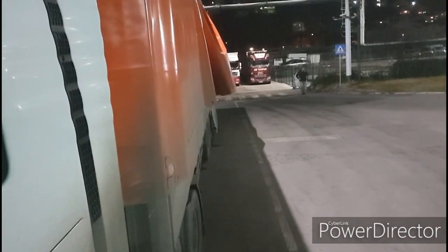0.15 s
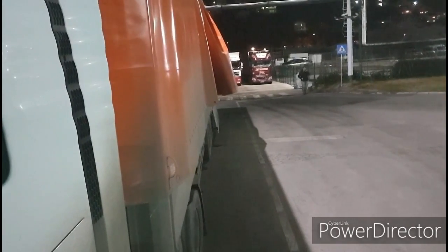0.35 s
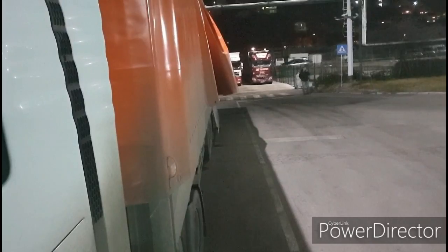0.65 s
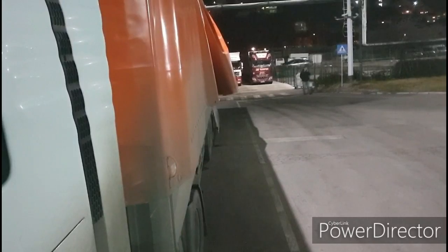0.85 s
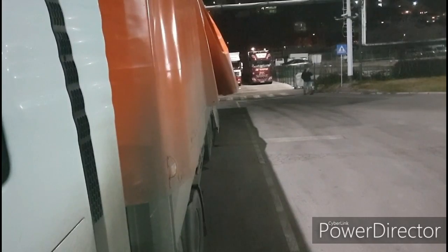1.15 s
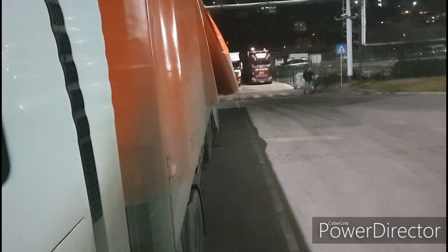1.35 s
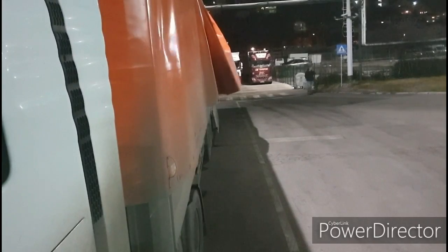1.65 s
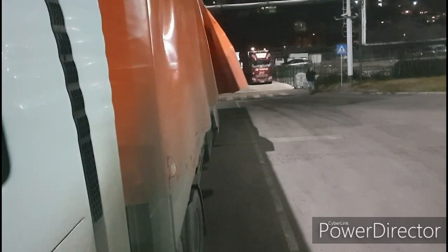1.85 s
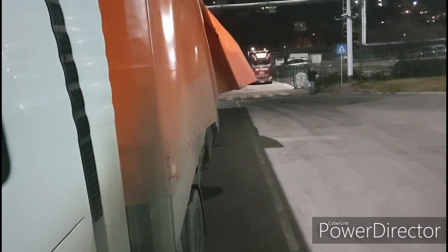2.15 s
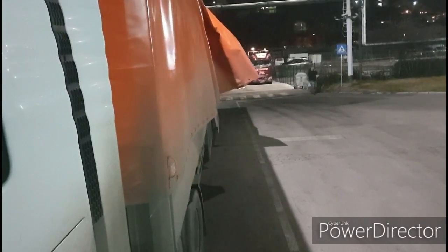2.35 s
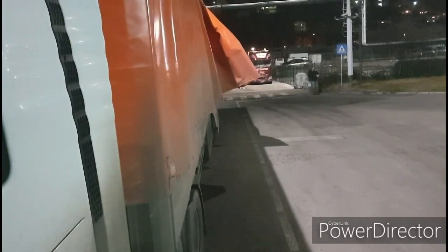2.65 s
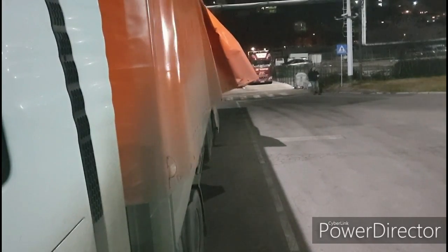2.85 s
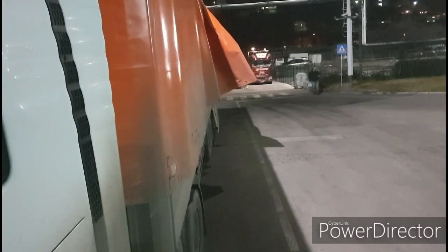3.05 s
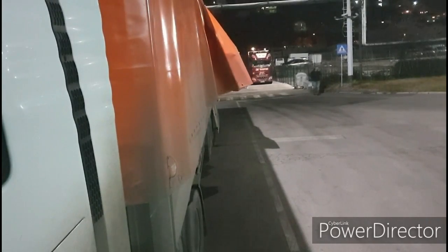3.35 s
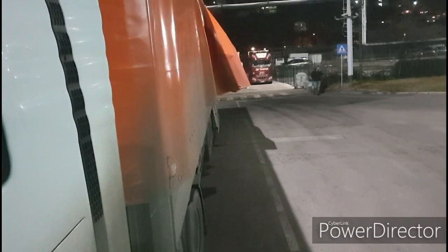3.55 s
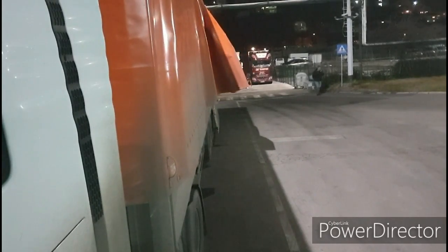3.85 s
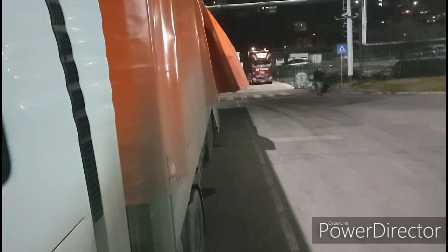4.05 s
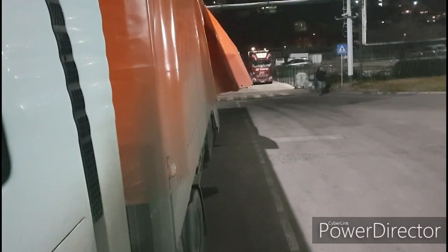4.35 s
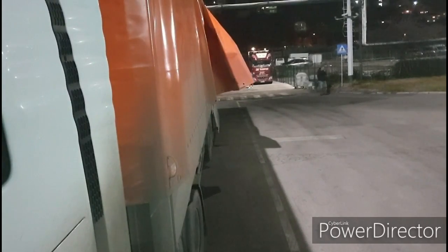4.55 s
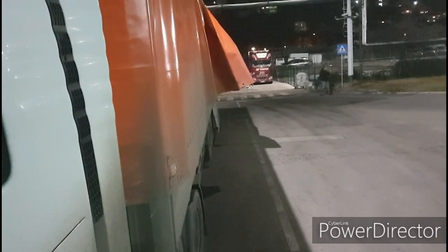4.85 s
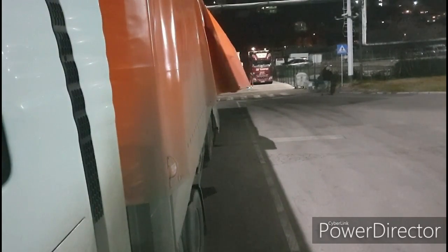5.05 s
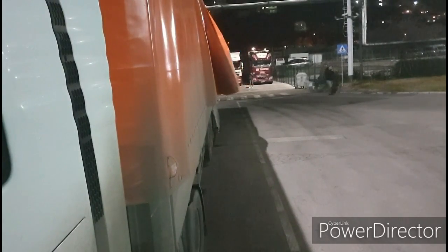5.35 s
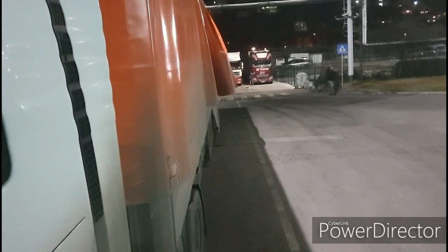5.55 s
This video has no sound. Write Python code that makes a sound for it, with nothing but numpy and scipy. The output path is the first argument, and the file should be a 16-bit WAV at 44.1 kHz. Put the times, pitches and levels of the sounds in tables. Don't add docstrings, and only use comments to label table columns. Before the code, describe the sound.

Handheld phone beside a parked curtain-sided trailer outdoors: steady low engine hum that swells and fades, with wind thumping the microphone in the first second. The tarpaulin rustles, snaps taut and knocks its side into a resonant boom with rebounds. Later come lighter slaps, a sharp triple tick, heaving fabric, and a sudden rattling metal clank to finish.

```python
import sys
import numpy as np
from scipy import signal
from scipy.fft import rfft, irfft
from scipy.io import wavfile
from scipy.ndimage import uniform_filter1d

SR = 44100
rng = np.random.default_rng(int(sys.argv[2]) if len(sys.argv) > 2 else 0)


def wrap_up_sound(samples):
    columns = np.atleast_2d(samples).T
    tamed = np.clip(columns, -1, 1)
    steps = np.round(tamed * 32767).astype(np.int16)
    wavfile.write(sys.argv[1], SR, steps)


def field_ratio(decibels):
    return 10 ** (np.asarray(decibels, dtype=float) / 20)


N = 251539
T = np.arange(N) / SR

SLOW_HZ, FAST_HZ = 47.51, 49.42
SLOW_ORDERS = [(1, -44.5), (2, -34.5), (3, -56), (4, -53.5), (6, -59.5)]
FAST_ORDERS = [(1, -48.5), (1.5, -53.5), (2, -31), (3, -40.5), (4, -58.5), (6, -56)]
OPPOSED_S = .172
# (frequency [Hz], level [dB])
HUMS = [(63.5, -52), (111.15, -53), (126.89, -45), (223, -55), (260.09, -50), (277.36, -48), (333.5, -55)]
HUM_TRIMS = [-5.5, 1.5, -1.5, -1, 0.5, 3, -1]
# (frequency [Hz], density [dB per Hz])
YARD_SPECTRUM = [(20, -23.5), (40, -29), (60, -10), (120, -15.5), (200, -21.5), (280, -21), (430, -28),
                 (800, -38.5), (1050, -30), (1500, -41.5), (2100, -43.5), (3000, -48.5), (7000, -56.5),
                 (8600, -72)]
YARD_DB = -37
# (frequency [Hz], shared power [0-1])
COHERENCE = [(60, 0.89), (300, 1), (640, 0.4), (2000, 0.66), (7000, 0.14), (10000, 0.04)]
FAR_LAG, BELLY_LAG, NEAR_LAG = 21, 11.5, -4
LEFT_DB = -1.24

# (time [s], level [dB])
LOAD = [(0, -57.5), (.3, -54.5), (.47, -66), (.74, -56), (1.1, -63), (1.35, -59.5), (1.8, -53.5),
        (2.15, -51.5), (2.5, -49.5), (2.8, -52), (3.31, -47), (3.6, -50), (3.85, -55), (4.14, -51),
        (4.45, -48.5), (5.05, -48.5), (5.17, -56.5), (5.7, -63.5)]
# (time [s], skin crackle [dB], belly heave [dB])
SNAPS = [(-.03, -76, -65.5), (.7, -79, -42), (1.1, -74, -49.5), (1.28, -82.5, -54), (1.95, -95, -44.5),
         (2.45, -89, -41.5), (2.56, -63.5, -62.5), (2.8, -76, -45.5), (3.57, -74, -42), (4.05, -76, -36.5),
         (4.19, -61.5, -46), (4.27, -62.5, -52), (4.47, -78.5, -42), (4.72, -87, -46.5), (4.93, -87, -37),
         (5.16, -88, -44), (5.45, -69, -58), (5.57, -69, -57)]
SNAP_RISE_S, CRACKLE_T60_S, HEAVE_T60_S = .025, .45, 0.7
BELLY_DB, SKIN_DB, FOLDS_DB = -46.5, -89, -21
BELLY_PER_LOAD, BELLY_PER_GAIN = 0.22, 0.71
# (frequency [Hz], density [dB per Hz])
BELLY_SPECTRUM = [(150, -7.5), (300, 4), (500, 4.5), (800, -5), (1200, -49.5)]
RUSTLE_SPECTRUM = [(600, -11.5), (1000, 1.5), (1500, -3), (2100, -4), (2900, -13.5), (4200, -10.5),
                   (6000, -32), (8500, -50)]
FOLDS_SPECTRUM = [(2000, -26), (3500, 0.5), (5500, -2.5), (7000, -3.5), (8500, -32.5)]
SKIN_SPECTRUM = [(6000, -39.0), (8000, 1.5), (9500, -3), (11000, -1), (13500, 1.0), (15500, -5.5)]

# (time of peak [s], level [dB], half length [s])
GUSTS = [
    (0, -41, .2),
    (.42, -38, .2),
    (.75, -33, .35),
    (1.6, -39, .2),
    (1.85, -37, .2),
    (2.4, -36, .25),
    (2.7, -38, .15),
    (3.3, -36, .25),
    (3.55, -40, .2),
    (5.6, -46, .12),
]
BREEZE_DB = -48.5
# (frequency [Hz], density [dB per Hz])
RUMBLE_SPECTRUM = [(15, -33), (40, 12.5), (90, 9.5), (140, 5), (300, -2.0), (600, -52.0)]
# (time [s], peak level [dB], pitch [Hz], left minus right [dB])
BUFFETS = [(0.124, -31, 61, -5), (0.367, -28.5, 55, 7), (.515, -31, 97, -3), (.59, -24.5, 98.6, -10),
           (0.636, -40, 100, -23), (.70, -35.5, 61.4, -10), (0.8715, -17, 94.2, -1.5), (.655, -32, 437, 3),
           (.76, -36, 243, -10), (.775, -34, 480, 5), (.82, -34, 193, -3), (.97, -31, 264, -2),
           (1.595, -32.5, 99, 4)]
# (time [s], peak level [dB], pitch [Hz], left minus right [dB])
PUFFS = [
    (.42, -45, 131, 3),
    (.787, -24, 91, 6),
    (0.947, -28, 105, -4),
    (1.824, -28.5, 59.6, 4),
    (5.626, -14.5, 93.5, 2.5),
    (5.686, -33, 110, -2),
]
BUFFET_SWINGS, PUFF_SWINGS = 2.47, 1.4

# (time [s], level [dB], t60 [s], brightness [dB per octave])
SLAPS = [(.57, -58, .05, -3), (.645, -42.5, 0.45, -0.5), (.70, -47, 0.45, 2.5), (1.248, -38, 0.17, 1.5),
         (2.184, -31.5, 0.12, 3.5), (2.2, -32.5, 0.24, 0.5), (2.325, -33, 0.32, -0.5),
         (2.8, -48.5, 0.74, 4.5), (3.58, -46.5, 0.12, 5.5), (4.111, -34.5, 0.05, -3),
         (4.25, -58.5, 0.4, 11.5), (4.46, -41.5, 0.4, 3), (4.955, -36.5, 0.14, -0.5),
         (5.092, -36, 0.05, -9), (5.44, -66, .1, 1)]
# (frequency [Hz], density [dB per Hz])
SLAP_SPECTRUM = [(300, -31), (550, -0.5), (1090, -2), (1400, -12.5), (3600, -18.5), (5400, -26.5),
                 (9000, -42), (13700, -51), (15500, -56.5)]
SLAP_RISE, THUD_RISE, BUCKLE_RISE, CRASH_RISE = 0.034, .03, 0.016, 0.019

# (frequency [Hz], level [dB], t60 [s])
PANEL_MODES = [(143, -21, 0.36), (201.5, -5.5, 0.67), (255.6, -5, 0.48), (291.8, -4.5, 0.45),
               (337.7, -13, 0.59), (480, -6, 0.2), (539, -13, 0.15), (661, -15, 0.19), (818, -15, 0.35),
               (1130, -16.5, .2)]
# (time [s], level [dB], length of push [s])
BLOWS = [(1.25, -32.5, .0013), (2.1832, -10.5, 0.0037), (2.213, -14, 0.0016), (2.262, -18, 0.0012),
         (2.287, -16, 0.0021), (2.326, -21, 0.0045), (2.34, -24, 0.0014), (2.365, -23.5, 0.0013),
         (2.382, -23.5, 0.0018), (2.415, -23.5, 0.0016), (2.801, -27.5, 0.0018), (2.869, -28.5, 0.0025),
         (4.95, -27, 0.0012), (5.019, -31.5, 0.00078), (5.633, -16.5, 0.0012), (5.666, -16, 0.00086),
         (5.682, -34.5, 0.00065)]
# (frequency [Hz], density [dB per Hz])
THUD_SPECTRUM = [(120, -20), (220, -1), (400, 1.5), (650, -5), (1100, -17.5), (1800, -43.5)]
THUD_DB, THUD_T60_S = -16, .2

# (time [s], level [dB], t60 [s], brightness [dB per octave])
BUCKLE_TICKS = [
    (4.1805, -28, .035, 0),
    (4.188, -35, .06, 0),
    (4.199, -41, .09, 0),
]
# (frequency [Hz], density [dB per Hz])
TICK_SPECTRUM = [(600, -15), (1000, 4), (1700, -17), (2600, -8.5), (3300, 0.5), (4600, -6.5), (5400, -18),
                 (8000, -34), (15000, -45)]

# (time [s], level [dB], t60 [s], brightness [dB per octave])
CRASH = [
    (5.611, -29.5, 0.44, 0.5),
    (5.6165, -22.5, 0.16, -2),
    (5.628, -26, 0.1, 2.5),
    (5.6365, -20, 0.033, 0),
    (5.646, -26.5, 0.21, 4.5),
    (5.655, -21.5, .08, -6),
    (5.668, -24, 0.11, -5.5),
    (5.683, -19.5, 0.19, -9.5),
]
# (frequency [Hz], density [dB per Hz])
LATCH_SPECTRUM = [(300, -14), (500, -9.5), (630, -12), (1260, -4.5), (1600, -8), (2000, -5.5),
                  (2650, -11.5), (3300, -7), (5000, -14.5), (9900, -25.5), (12500, -27), (12900, -66),
                  (14300, -47.5), (15000, -62.5)]
# (frequency [Hz], level [dB], t60 [s])
BAR_MODES = [(1278, -3.5, 0.062), (1420, -9, 0.045), (1907, -4, 0.041), (2113, -4.5, 0.052),
             (3160, -6, 0.036), (3550, -7, 0.048), (4330, -7.5, 0.099), (5140, -5, 0.045),
             (6240, -4, 0.054)]
# (time [s], peak level [dB])
KNOCKS = [
    (5.6175, -28),
    (5.6372, -16),
    (5.658, -25.5),
    (5.682, -24),
]

# (time [s], step [dB])
GAIN_STEPS = [
    (-.5, -6),
    (.13, -2),
    (.42, -3.5),
    (2.12, 2.5),
    (2.35, -3.5),
    (5.1, 0),
    (5.58, 3.5),
]
OPEN_DB, STEP_S, RECOVER_S = 3, 0.069, 1.97
# (time [s], depth [dB])
GUST_DIPS = [(0.47, -12), (0.552, -25), (.67, -24), (0.728, -23), (0.823, -12), (0.93, -4), (0.972, -7),
             (3.304, -8), (3.578, -6), (4.08, -3), (5.658, -2)]
# (time [s], depth [dB])
JOLT_DIPS = [
    (1.71, -7),
    (2.192, -6),
    (2.261, -14),
    (2.315, -13),
    (4.174, -12),
    (4.328, 0),
    (5.119, -3),
    (5.613, -3.5),
]
GUST_HALF_S, JOLT_HALF_S = 0.049, 0.023
# (frequency [Hz], spread [dB])
PATCHY = [(130, 0), (300, 1.6), (500, 3), (2000, 3), (6000, 2.7), (9000, 6), (15000, 5.5)]


def unit(x):
    return x / np.sqrt(np.mean(x ** 2))


def at(points, hz):
    f, v = np.transpose(points)
    return np.interp(np.log(np.maximum(hz, 1)), np.log(f), v)


def colour(x, points):
    count = x.shape[-1]
    hz = np.fft.rfftfreq(count, 1 / SR)
    return irfft(rfft(x) * field_ratio(at(points, hz)), count)


def walk(rate):
    k = int(SR / rate)
    held = np.repeat(rng.standard_normal(N // k + 1), k)
    return 0.9 * uniform_filter1d(uniform_filter1d(held, k), k)[:N]


def hump(s, half):
    return np.cos(np.pi / 2 * np.clip((T - s) / half, -1, 1)) ** 2


def burst(s, rise, t60):
    t = np.maximum(T - s, 0)
    return (1 - np.exp(-t / rise)) * 1000. ** (-t / t60)


def ports(count, lag):
    hz = np.fft.rfftfreq(count, 1 / SR)
    alike = np.clip(at(COHERENCE, hz), 0, 1)
    shared, left, right = rfft(rng.standard_normal((3, count)))
    late = np.exp(-2j * np.pi * hz * lag / SR)
    common = np.sqrt(alike) * shared * np.array([late, late ** 0])
    return irfft(common + np.sqrt(1 - alike) * np.array([left, right]), count)


def ring(push, modes, speak=0.003):
    t = T[:SR // 2]
    bell = 0
    for k, (hz, db, t60) in enumerate(modes):
        bell = bell + (-1) ** k * field_ratio(db) * np.sin(2 * np.pi * hz * t) * 1000. ** (-t / t60)
    bell = bell * (1 - np.exp(-t / speak))
    return signal.fftconvolve(push, bell[None], axes=1)[:, :push.shape[1]]


def add(out, s, sound):
    i = int(s * SR)
    out[:, i:i + sound.shape[1]] += sound[:, :N - i]


def cracks(table, spectrum, rise):
    out, t = np.zeros((2, N)), T[:SR // 2]
    for s, db, t60, tilt_db in table:
        tilted = [(hz, level + tilt_db * np.log2(hz / 2000)) for hz, level in spectrum]
        grit = field_ratio(1.9 * np.repeat(rng.standard_normal(len(t) // 50 + 1), 50)[:len(t)])
        noise = unit(colour(ports(len(t), lag=NEAR_LAG) * grit, tilted))
        add(out, s, field_ratio(db) * noise * burst(0, rise * t60, t60)[:len(t)])
    return out


def gain_db():
    return OPEN_DB + sum(step * burst(s, STEP_S, RECOVER_S * np.log(1000)) for s, step in GAIN_STEPS)


def machines():
    lines = [(SLOW_HZ * k, db, np.pi * (k == 2)) for k, db in SLOW_ORDERS]
    lines += [(FAST_HZ * k, db, 0) for k, db in FAST_ORDERS]
    lines += [(hz, db + trim_db, 0) for (hz, db), trim_db in zip(HUMS, HUM_TRIMS)]
    out = 0
    for hz, db, start in lines:
        loose = (hz / 200) ** 2
        level = np.sqrt(2) * field_ratio(db + .6 * loose * walk(3))
        phase = 2 * np.pi * hz * (T - OPPOSED_S) + start + .15 * loose * walk(2)
        out = out + level * np.sin(phase)
    return out * np.ones((2, 1))


def yard():
    roar = rfft(colour(ports(N, lag=FAR_LAG), YARD_SPECTRUM))
    hz = np.fft.rfftfreq(N, 1 / SR)
    out, shared = 0, walk(4.17)
    for centre in 22 * 2 ** np.arange(0, 10, .5):
        octaves = np.log2(np.maximum(hz, 1) / centre)
        band = np.cos(np.pi * np.clip(octaves, -.5, .5)) ** 2
        shared = 1.021 * shared + 0.17 * walk(4.73)
        out = out + irfft(roar * band, N) * field_ratio(shared + 0.87 * walk(16))
    return field_ratio(YARD_DB) * unit(out)


def curtain():
    load_db = np.interp(T, *np.transpose(LOAD))
    heave = field_ratio(BELLY_DB + BELLY_PER_LOAD * (load_db - load_db.mean()) + BELLY_PER_GAIN * gain_db())
    heave = heave + sum(field_ratio(db) * burst(s, SNAP_RISE_S, HEAVE_T60_S) for s, _, db in SNAPS) / 2
    snap = field_ratio(SKIN_DB) + sum(field_ratio(db) * burst(s, SNAP_RISE_S, CRACKLE_T60_S) for s, db, _ in SNAPS)
    grains = field_ratio(2.0 * walk(60) + 0.28 * walk(12))
    belly = colour(ports(N, lag=BELLY_LAG), BELLY_SPECTRUM) * field_ratio(0.83 * walk(11))
    rustle = colour(ports(N, lag=NEAR_LAG) * grains, RUSTLE_SPECTRUM)
    crackle = colour(ports(N, lag=NEAR_LAG) * grains, SKIN_SPECTRUM)
    folds = colour(ports(N, lag=NEAR_LAG) * grains, FOLDS_SPECTRUM)
    rubbing = unit(rustle) + field_ratio(FOLDS_DB) * unit(folds)
    return heave * unit(belly) + field_ratio(load_db) * rubbing + snap * unit(crackle)


def wind():
    rumble = colour(rng.standard_normal((2, N)), RUMBLE_SPECTRUM)
    lumps = field_ratio(np.array([2.0 * walk(23), 7.2 * walk(6.62)]))
    gusts = field_ratio(BREEZE_DB) + sum(field_ratio(db) * hump(s, half) for s, db, half in GUSTS)
    out = unit(rumble * lumps) * gusts
    for table, swings in (BUFFETS, BUFFET_SWINGS), (PUFFS, PUFF_SWINGS):
        for s, db, hz, pan_db in table:
            length = swings / hz
            t = np.arange(-length, length, 1 / SR)
            swing = np.cos(np.pi * t / length / 2) ** 2 * -np.cos(2 * np.pi * hz * t)
            add(out, s - length, swing * field_ratio(db + np.array([[pan_db], [-pan_db]]) / 2))
    return out


def slaps():
    return cracks(SLAPS, SLAP_SPECTRUM, SLAP_RISE)


def panel():
    out = np.zeros((2, N))
    chance = rng.standard_normal((len(BLOWS), 2, len(PANEL_MODES)))
    for (s, db, push), spot in zip(BLOWS, chance):
        force = np.zeros((1, SR // 2))
        force[0, :int(push * SR)] = np.hanning(int(push * SR))
        sides = []
        for port in spot:
            modes = [(hz, level + 2.9 * c, t60) for (hz, level, t60), c in zip(PANEL_MODES, port)]
            sides.append(ring(force, modes))
        boom = np.vstack(sides)
        add(out, s, field_ratio(db) * boom / np.max(np.abs(boom)))
    thuds = [(s, db + THUD_DB, THUD_T60_S, 0) for s, db, _ in BLOWS]
    return out + cracks(thuds, THUD_SPECTRUM, THUD_RISE)


def buckle():
    return cracks(BUCKLE_TICKS, TICK_SPECTRUM, BUCKLE_RISE)


def latch():
    crash = cracks(CRASH, LATCH_SPECTRUM, CRASH_RISE)
    out = crash + field_ratio(-36) * ring(crash, BAR_MODES, speak=.0005)
    push = np.zeros((1, SR // 10))
    push[0, :6] = np.hanning(6)
    knock = ring(push, BAR_MODES[:4], speak=.0003)
    for s, db in KNOCKS:
        add(out, s, field_ratio(db) * knock / np.max(np.abs(knock)) * np.ones((2, 1)))
    return out


def wind_guard():
    gusts_db = sum(db * hump(s, GUST_HALF_S) for s, db in GUST_DIPS)
    jolts_db = sum(db * hump(s, JOLT_HALF_S) for s, db in JOLT_DIPS)
    return field_ratio(gusts_db + jolts_db)


def scene():
    steady = (machines() + yard()) * field_ratio(gain_db())
    air = steady + curtain() + slaps() + panel() + buckle() + latch()
    bass = colour(air, [(280, -0.5), (500, -35.5)])
    guarded = air + bass * (wind_guard() - 1)
    return guarded * field_ratio(np.array([[LEFT_DB], [-LEFT_DB]]) / 2) + wind()


def noise_filter(x):
    hz, _, cells = signal.stft(x, SR, nperseg=2048)
    field = rng.standard_normal(cells.shape[1:])
    field = uniform_filter1d(uniform_filter1d(field, size=2, axis=0), size=2, axis=1) * 2
    treble = np.abs(cells[:, hz > 2500]).mean(axis=(0, 1))
    spread_db = at(PATCHY, hz)[:, None] * np.clip(1.4 * np.median(treble) / treble, .5, 1)
    added_db = spread_db ** 2 * np.log(10) / 10 / 2
    return signal.istft(cells * field_ratio(spread_db * field - added_db), SR, nperseg=2048)[1][:, :N]


def band_limit(x):
    return signal.sosfilt(signal.butter(12, 15660, fs=SR, output="sos"), x)


def record(dry):
    top = signal.ellip(8, .2, 70, 15350, fs=SR, output="sos")
    hiss = field_ratio(-92.0) * rng.standard_normal(dry.shape)
    mix = signal.sosfilt(top, noise_filter(dry + hiss))
    return band_limit(mix)


dry = scene()
out = record(dry)
wrap_up_sound(out)
```